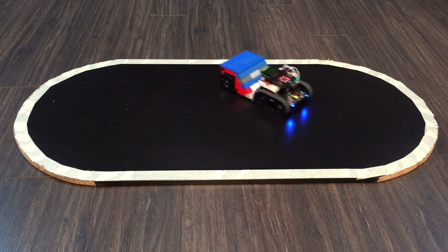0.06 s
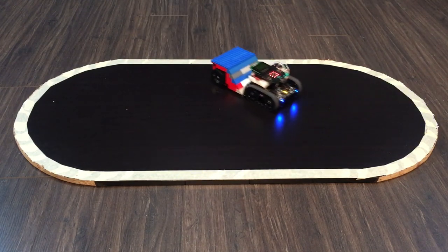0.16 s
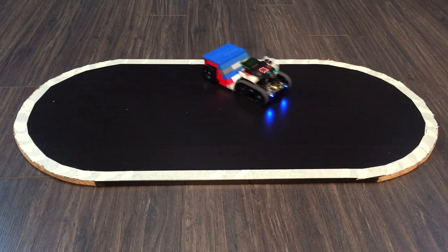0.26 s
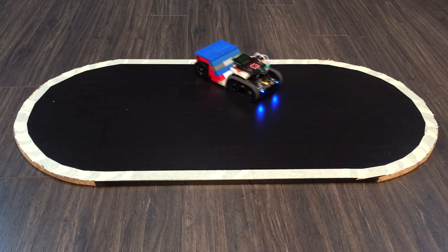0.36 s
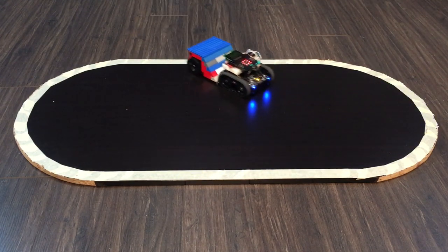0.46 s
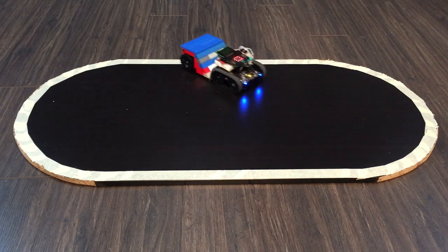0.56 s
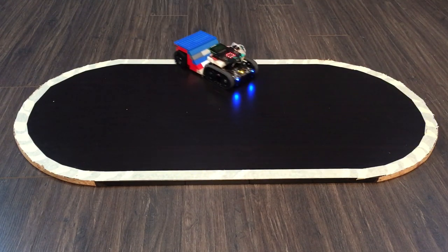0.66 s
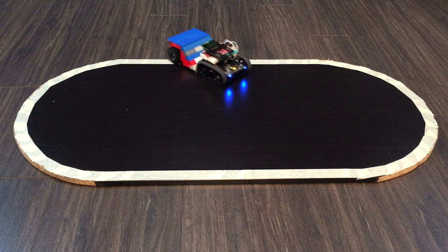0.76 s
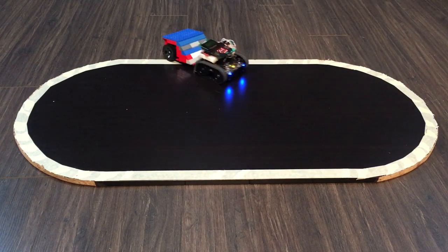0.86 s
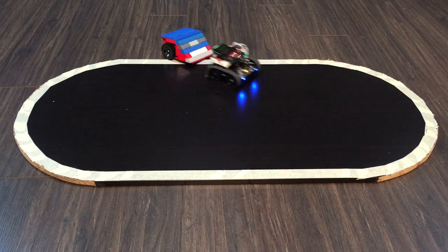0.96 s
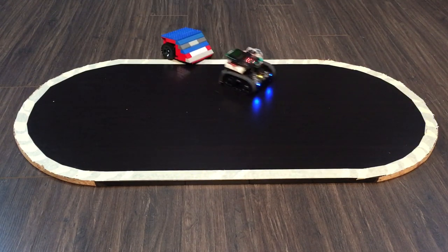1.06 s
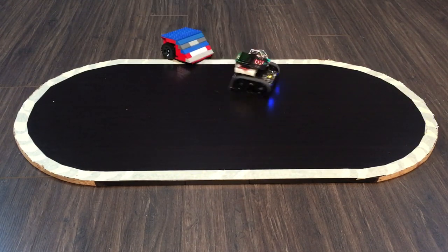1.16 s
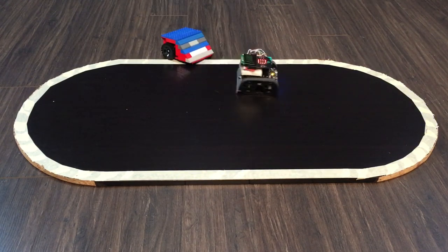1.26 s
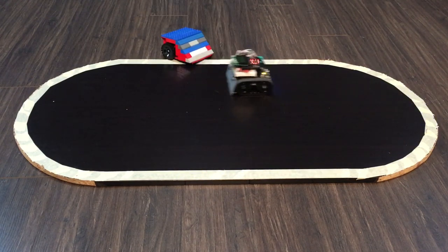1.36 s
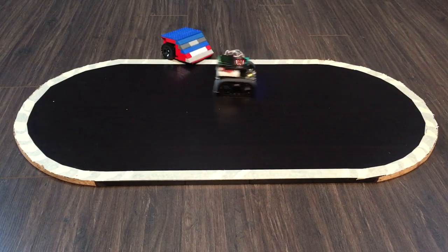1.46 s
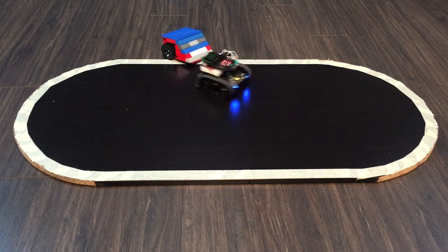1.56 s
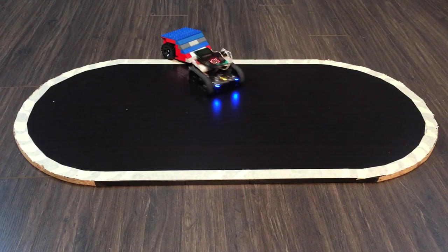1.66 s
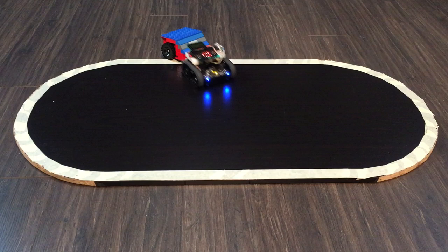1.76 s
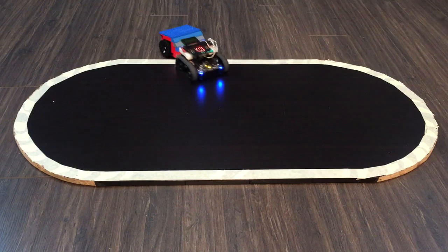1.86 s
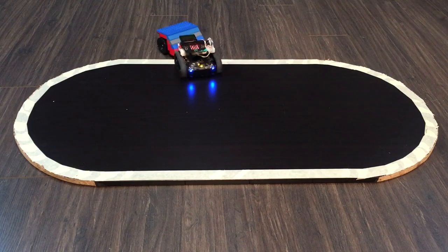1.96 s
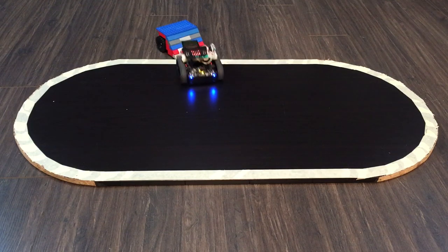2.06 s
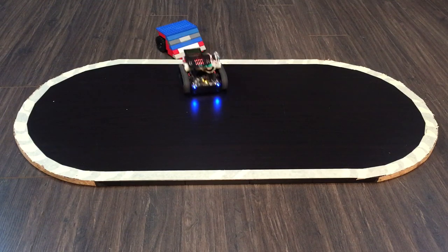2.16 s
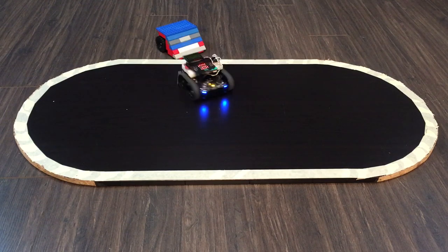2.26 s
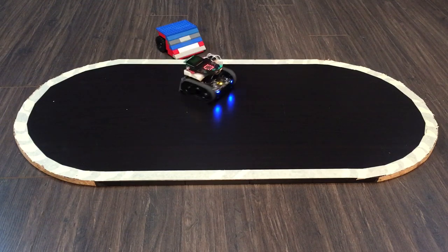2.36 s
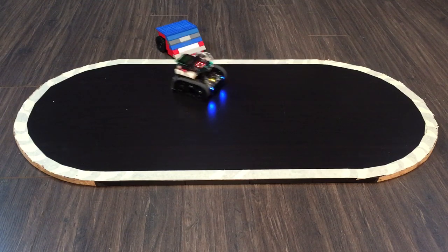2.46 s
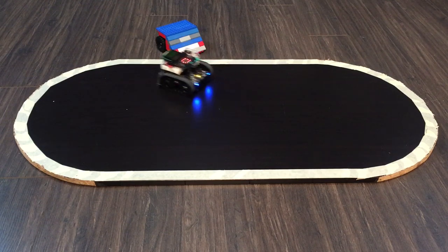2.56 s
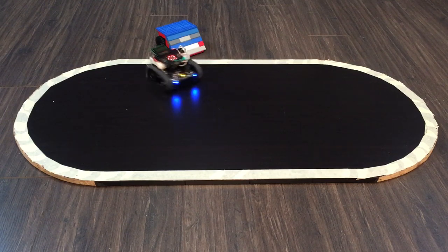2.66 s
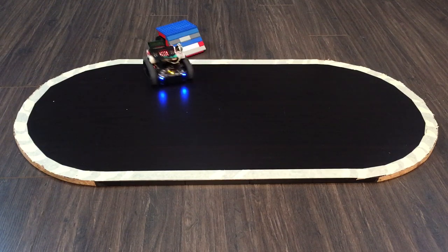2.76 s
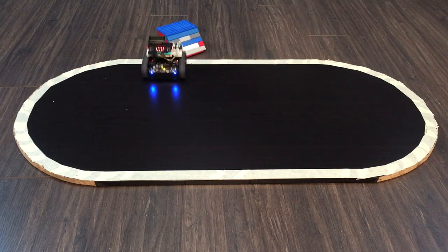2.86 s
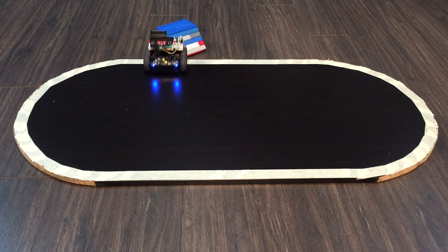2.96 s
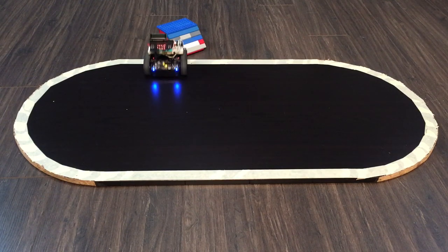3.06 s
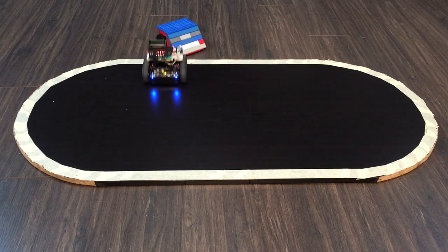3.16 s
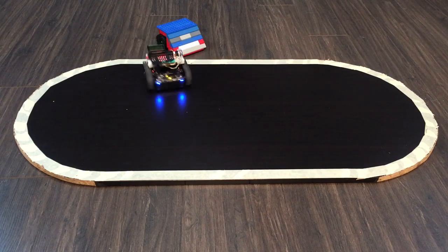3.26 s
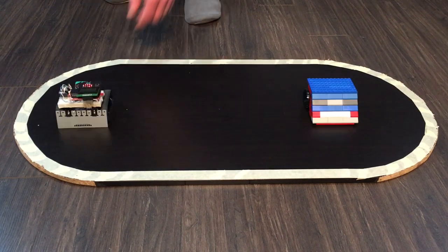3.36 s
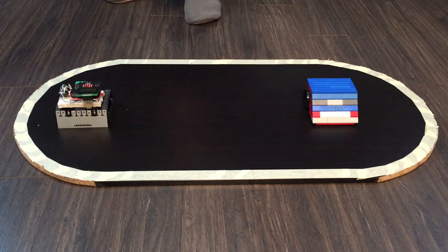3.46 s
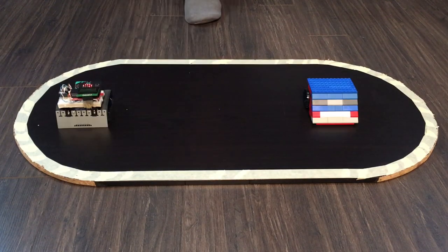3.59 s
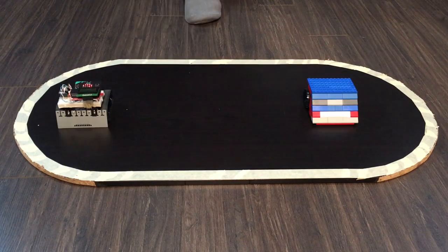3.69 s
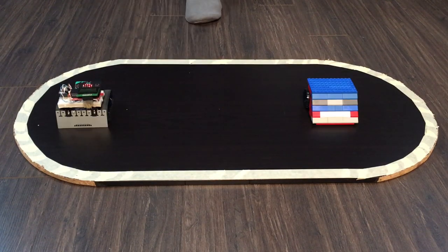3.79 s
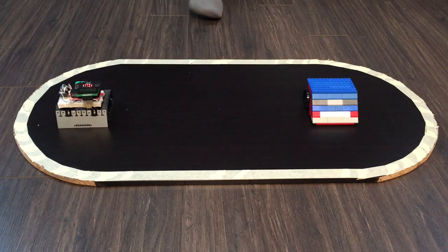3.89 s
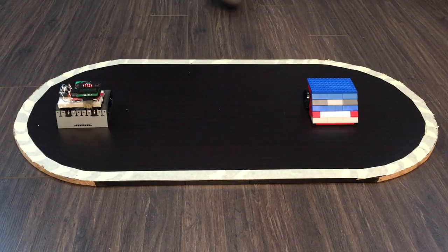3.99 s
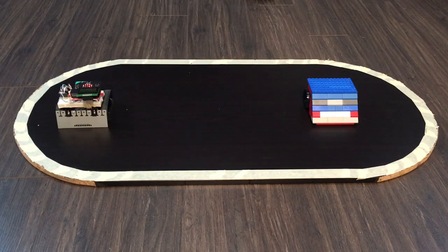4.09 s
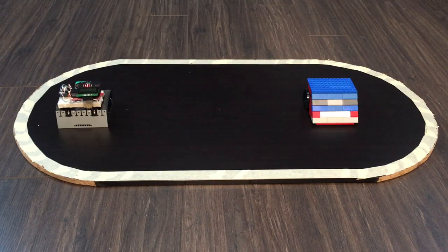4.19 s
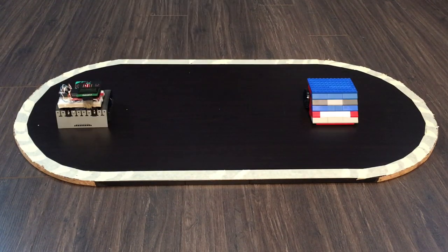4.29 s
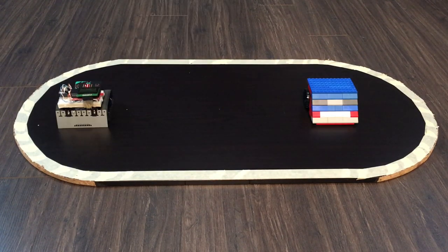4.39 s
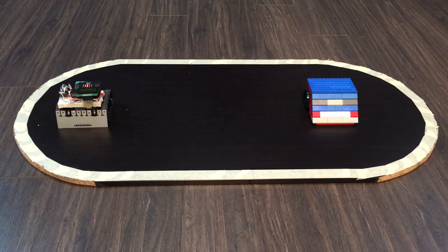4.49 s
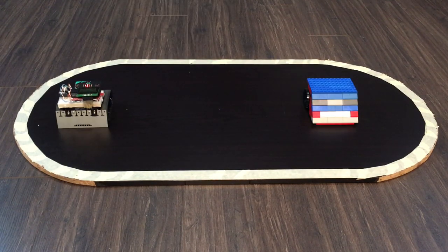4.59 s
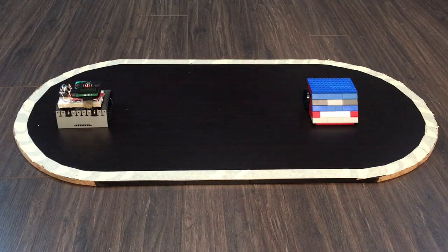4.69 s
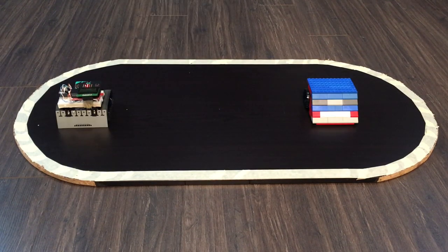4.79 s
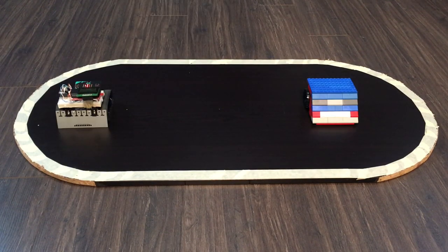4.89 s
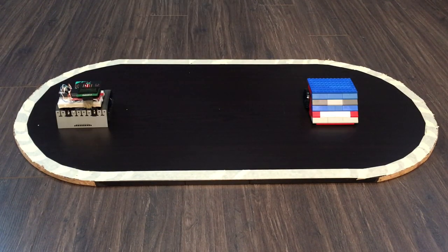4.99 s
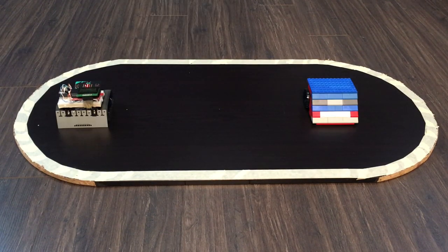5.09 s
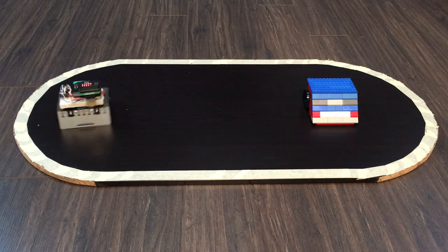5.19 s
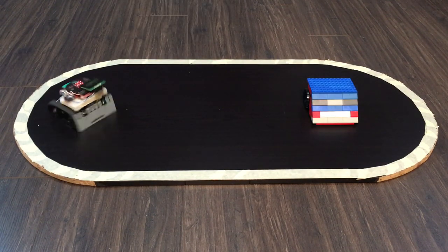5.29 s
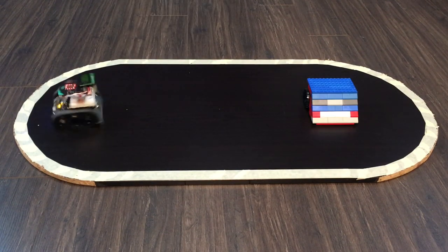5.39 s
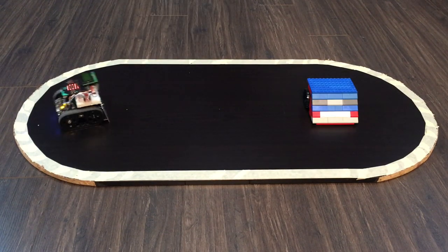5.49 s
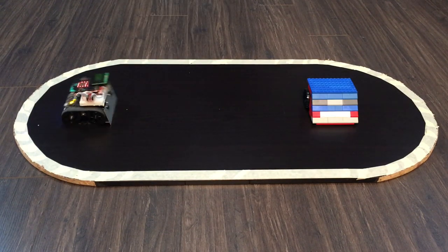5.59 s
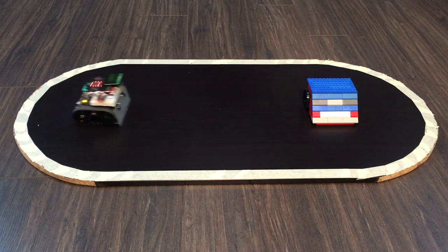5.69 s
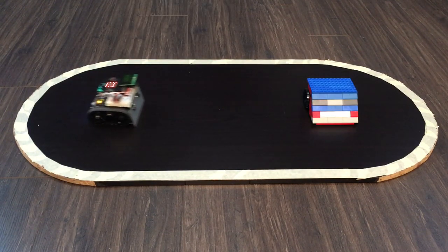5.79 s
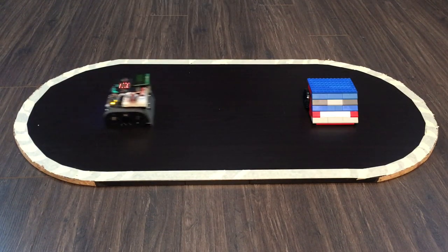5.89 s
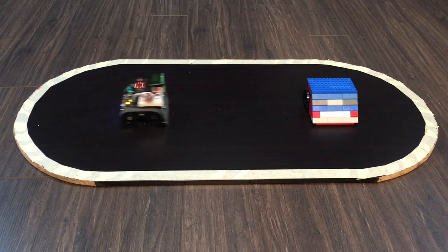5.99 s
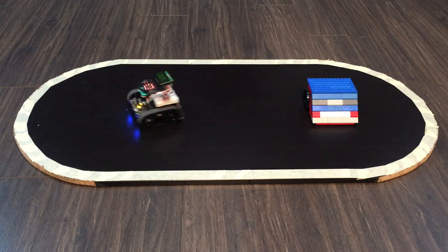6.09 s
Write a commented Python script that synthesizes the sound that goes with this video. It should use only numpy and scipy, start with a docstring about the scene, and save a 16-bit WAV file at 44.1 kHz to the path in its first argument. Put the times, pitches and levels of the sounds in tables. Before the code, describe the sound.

Small robot motors whine and rattle in surges, with hollow thumps and plastic clacks, then after a quiet pause a second robot whirs.

```python
"""Tracked robots on a wooden ring

Close to the microphone, in a live room with a mains hum, a small tracked robot shoves a plastic brick
car off a wooden ring and turns back. Its two geared motors whine and rattle; it thumps on the hollow
board and clacks against the car. After a quick fade come a faint scrape and soft steps moving away,
then a second robot starts up and pivots, its scoop clinking as it touches down."""
import sys
import numpy as np
from scipy import signal
from scipy.fft import rfft, irfft, next_fast_len
from scipy.io import wavfile

SR = 44100
rng = np.random.default_rng(int(sys.argv[2]) if len(sys.argv) > 2 else 0)


def unload_wav(signal):
    """Save mono or channel-first audio to the path in sys.argv[1] as 16-bit WAV at rate SR, clipped to [-1, 1]."""
    wavfile.write(
        sys.argv[1],
        SR,
        np.round(np.clip(np.atleast_2d(signal).T, -1, 1) * 32767).astype(np.int16),
    )


N = 270774
T = np.arange(N) / SR


def undb(db):
    """Decibels to gain."""
    return 10 ** (np.asarray(db) / 20)


def unit(x):
    """Scale to rms 1."""
    return x / np.sqrt(np.mean(x ** 2))


def peak(x, db):
    """Scale to a peak level."""
    return x * undb(db) / np.abs(x).max()


def noise(size=N):
    """White noise."""
    return rng.standard_normal(size)


def wander(rate_hz):
    """Smooth random drift of rms 1."""
    return unit(np.interp(T * rate_hz, np.arange(N), noise()))


def band(x, low_hz, high_hz, order=2):
    """Band-pass."""
    edges = [low_hz, min(high_hz, SR / 2 - 1)]
    return signal.sosfilt(signal.butter(order, edges, "band", fs=SR, output="sos"), x)


def colour(x, points):
    """Minimum-phase filter through (frequency_hz, gain_db) points."""
    hz, db = np.transpose(points)
    size = next_fast_len(len(x) + 4096)
    size += size % 2
    bins_hz = np.maximum(np.arange(size // 2 + 1) * SR / size, 1)
    gain = undb(np.interp(np.log(bins_hz), np.log(hz), db))
    cepstrum = irfft(np.log(gain))
    cepstrum[1:size // 2] *= 2
    cepstrum[size // 2 + 1:] = 0
    return irfft(rfft(x, size) * np.exp(rfft(cepstrum)))[:len(x)]


def add(out, start_s, x):
    """Mix a sound in at a time."""
    i = int(start_s * SR)
    out[i:i + len(x)] += x[:N - i]


def settle(times, targets, initial, rise_s=0.015, fall_s=0.015):
    """Close in on each new target, by default as fast as the load on the gears settles."""
    out = np.full(N, float(initial))
    for start_s, target in zip(times, targets):
        i = int(start_s * SR)
        lag_s = rise_s if target > out[i] else fall_s
        out[i:] = target + (out[i] - target) * np.exp(-T[:N - i] / lag_s)
    return out


# How well the gearbox radiates the mesh tone: pitch_hz, gain_db
GEARBOX_RESPONSE = [(1800, -23), (2300, 0), (2650, -2), (3100, -7.5), (3450, 0.5), (3850, 2.5), (4300, 3.5)]


def motor(times, commanded_hz, pick_up_hz=2246, strain_db_per_octave=-6):
    """A motor's mesh pitch and tone gain in dB; the tone thins while it strains or coasts."""
    hz = settle(times, commanded_hz, pick_up_hz, rise_s=0.052, fall_s=0.034)
    aim_hz = settle(times, commanded_hz, commanded_hz[0])
    radiated_db = np.interp(hz, *np.transpose(GEARBOX_RESPONSE))
    strain_db = strain_db_per_octave * np.abs(np.log2(hz / aim_hz))
    track_drag = 1 + 0.006 * wander(24)
    return hz * track_drag, radiated_db + strain_db


# Overtones of the meshing teeth: multiple, gain_db
MESH_OVERTONES = [(2, -14), (3, -9.5), (4, -8.5), (5, -7.5), (6, -8)]


def gear_whine(hz, whine_db, overtone_db, teeth=12, rough_db=3, top_hz=14200):
    """Teeth mesh at an unsteady rate, so higher overtones smear; the off-centre pinion adds sidebands."""
    unsteady_hz = hz * (1 + 0.0055 * wander(70) + 0.005 * wander(1200))
    mesh = 2 * np.pi * np.cumsum(unsteady_hz) / SR
    mesh += 0.22 * np.sin(mesh / teeth)
    backlash = 0.7 * wander(260)
    grip = undb(rough_db * wander(250) + 2.2 * wander(50))
    rasp = 0.45 * wander(900) * np.cos(mesh)
    out = undb(whine_db) * unit(grip * (np.sin(mesh + backlash) + rasp))
    for multiple, db in MESH_OVERTONES:
        radiated = 1 / (1 + (multiple * hz / top_hz) ** 24)
        tooth_load = undb(rough_db * wander(300) + 3.5 * wander(45))
        out += radiated * undb(overtone_db + db) * unit(tooth_load * np.sin(multiple * mesh))
    return out


def tooth_marks(hz, teeth=12, points=2048, orders=64, uneven_db=4.5):
    """Gear flaws come round with every shaft turn: an uneven comb that follows the speed."""
    one_turn = irfft(rfft(noise(points))[:orders] * undb(uneven_db * noise(orders)), points)
    turns = np.cumsum(hz * (1 + 0.005 * wander(70))) / SR / teeth
    return unit(np.interp(turns % 1, np.arange(points) / points, one_turn))


def gear_rattle(hz, other_hz, chassis, grain_db=2, chatter_db=1):
    """Loose teeth and brushes tick into the chassis, partly at random, partly in step with the shafts."""
    marks = sum(wander(14) * tooth_marks(mesh_hz) for mesh_hz in (hz, hz, other_hz, other_hz))
    ticks = noise() + 0.5 * band(marks, 4500, 20000, order=1)
    flicker = undb(grain_db * wander(2500) + chatter_db * wander(150))
    rattle = colour(ticks * flicker, chassis)
    return rattle / band(rattle, 8000, 15500).std()


# Gearbox and chassis colour, one list for each robot: frequency_hz, gain_db
CHASSIS_COLOURS = [
    [(180, -45.5), (300, -5), (469, -4), (643, -17), (1170, -21), (1400, -11), (1990, -8), (2590, -9),
     (3990, -6.5), (4870, -12), (6040, -8), (9290, -10.5), (10400, -4.5), (12300, -6.5), (15800, -9)],
    [(180, -44), (300, -12.5), (391, -4.5), (723, -27), (911, -14), (1130, -16.5), (1400, -9.5),
     (2160, -9.5), (2550, -7.5), (2820, -3), (4870, -6.5), (9290, -8), (10300, -2), (12100, -3.5),
     (15800, -6.5)],
]
# The drive cuts out briefly as a robot changes direction: centre_s, depth_db
DRIVE_PAUSES = [(.84, -1.5), (1.097, -13), (1.93, -10), (2.175, -12), (2.68, -5.5), (3.188, -9),
                (5.446, -4.5)]


def robot(commands, chassis_index, whine_db, rattle_db, pause_s=0.015):
    """Two motors and their gear trains in one chassis, following the drive commands."""
    times, lead_aim_hz, other_aim_hz, *levels = np.transpose(commands)
    lead_hz, lead_tone_db = motor(times, lead_aim_hz)
    other_hz, other_tone_db = motor(times, other_aim_hz)
    drive_db, lead_db, other_db, overtone_db = (settle(times, db, db[0]) for db in levels)
    drive_db += sum(db * np.exp(-0.5 * ((T - s) / pause_s) ** 2) for s, db in DRIVE_PAUSES)
    lead = gear_whine(lead_hz, drive_db + lead_db + whine_db + lead_tone_db, drive_db + overtone_db)
    other = gear_whine(other_hz, drive_db + other_db + other_tone_db, drive_db + other_db - 0.5)
    rattle = gear_rattle(lead_hz, other_hz, CHASSIS_COLOURS[chassis_index])
    return lead + other + undb(drive_db + rattle_db) * rattle


# The first robot's drive commands; the last three columns are offsets from drive_db:
# start_s, lead_pitch_hz, other_pitch_hz, drive_db, lead_db, other_db, lead_overtone_db
SHOVE_COMMANDS = [(0, 2415, 2136, -47.5, -6, -15, 1.5), (.312, 2139, 2102, -49, -3.5, -3.5, 0),
                  (.879, 3810, 3700, -45, -6.5, -17, -13), (1.076, 2566, 2116, -49, -3.5, -7.5, -5),
                  (1.284, 3116, 3053, -45.5, -10, -8, 2), (1.396, 4202, 4136, -45, -6, -8.5, 5),
                  (1.545, 3060, 3893, -46.5, -1, -21, 6), (1.723, 3635, 3789, -44, -4, -19.5, 3.5),
                  (1.88, 2330, 3030, -45, -10, -18, -4), (1.98, 3960, 3800, -45.5, -5.5, -15, -6),
                  (2.15, 2440, 2043, -49.5, -2.5, -14, -5), (2.37, 2953, 2750, -45.5, -15, -4, 4),
                  (2.451, 3766, 3550, -43.5, -6.5, -9.5, -4), (2.556, 4235, 4130, -44, -6, -14.5, -4),
                  (2.648, 3045, 4117, -46.5, 1.5, -22, 6), (2.915, 3585, 3380, -46.5, -15, -6, -17.5),
                  (3.175, 2544, 3900, -49, -6, -12, -7)]


def shoving_robot():
    """Close by on the ring, the first robot's motors surge and slow as it shoves and turns."""
    return robot(SHOVE_COMMANDS, chassis_index=0, whine_db=0.5, rattle_db=-2)


# The board under the car's wheels: frequency_hz, gain_db
WHEEL_RUMBLE = [(53, -30), (90, -41), (130, -8.5), (178, -24.5), (220, -1.5), (254, -5), (329, 1.5),
                (370, -2), (470, -5.5), (599, -15.5), (658, -16), (740, -21.5), (1100, -25.5), (1500, -25),
                (1950, -44), (3300, -120)]


def rolling_car(edge_s=0.747, release_s=0.1, fade_db_per_s=-7):
    """Hard wheels drum the board, ever more lightly, until the car leaves its edge."""
    on_board = np.clip((edge_s - T) / release_s, 0, 1)
    rumble = unit(colour(noise() * undb(0.66 * wander(91)), WHEEL_RUMBLE))
    return on_board * undb(-45 + fade_db_per_s * T) * rumble


# Air in the room: frequency_hz, gain_db
ROOM_AIR = [(15, -59.5), (25, -45.5), (49, -16.5), (86, -18.5), (102, -19), (123, -15.5), (152, -15),
            (189, -19), (333, -13.5), (392, -20), (691, -21), (834, -24.5), (981, -21.5), (1430, -30.5),
            (15800, -49)]
# An appliance in the room: pitch_hz, level_db
MAINS_HUM = [(60, -75.5), (120, -63.5), (197, -75.5), (423, -75)]


def room_tone():
    """Steady air and an appliance's mains hum around the microphone."""
    air = colour(noise(), ROOM_AIR)
    out = undb(-64) * air / band(air, 210, 15800).std()
    for hz, db in MAINS_HUM:
        level = undb(db + 0.87 * wander(5.6))
        out += level * unit(np.sin(2 * np.pi * hz * T + 0.25 * wander(2.8)))
    return out


# Modes of the hollow board: pitch_hz, gain_db, t60_s
BOARD_MODES = [(131.5, -6.5, 0.18), (160.7, -7, 0.15), (233.4, -9.5, 0.25), (309, -10, 0.096),
               (359.8, 4.5, 0.082), (416, 0.5, 0.065), (502.5, -3, 0.096), (553, -2, 0.089),
               (599, -4.5, 0.07), (660, -5, 0.061), (704.5, -8, 0.1), (768, -14.5, 0.12), (933, -18, 0.062),
               (1240, -12, 0.061)]
# Blows on the board: start_s, level_db, clatter_offset_db, centre_hz
BOARD_THUMPS = [(.318, -28, -14, 310), (0.577, -27, -12, 287), (.612, -30.5, -22, 280),
                (.857, -18.5, -11, 351), (0.904, -29.5, -4.5, 413), (.926, -24.5, -8, 363),
                (1.796, -18, -8, 363), (1.84, -22.5, -17, 400), (1.953, -18.5, -16, 509),
                (1.974, -25.5, -13, 470), (2.005, -22.5, -10, 424), (2.0225, -13, -8, 490),
                (2.052, -22, -6.5, 482.6), (2.945, -29.5, 1, 421.6), (2.975, -22.5, -7, 450),
                (2.992, -25.5, -12, 436.5), (3.067, -28.5, 1.5, 210)]


def board_thumps(attack_s=0.00093, thud_s=0.0097, clatter_s=0.0068, spread_octaves=1.01):
    """Each drop rings the board's modes, the low ones when it is soft, and shakes loose plastic parts."""
    out, t = np.zeros(N), T[:SR // 2]
    for start_s, db, clatter_db, centre_hz in BOARD_THUMPS:
        ring = np.zeros(len(t))
        for hz, mode_db, t60 in BOARD_MODES:
            scatter_db, detune, phase = noise(3)
            reach = np.exp(-0.5 * (np.log2(hz / centre_hz) / spread_octaves) ** 2)
            # one blow starts all the modes nearly in step
            swing = np.sin(2 * np.pi * hz * (1 + 0.005 * detune) * t + 0.5 * phase)
            ring += reach * undb(mode_db + scatter_db - 60 * t / t60) * swing
        ring *= 1 - np.exp(-t / attack_s)
        thud = band(noise(len(t)) * np.exp(-t / thud_s), centre_hz * 0.74, centre_hz * 1.36)
        clatter = band(noise(len(t)) * np.exp(-t / clatter_s), 990, 2140, order=1)
        add(out, start_s, peak(ring, db - 2) + peak(thud, db - 5) + peak(clatter, db + clatter_db))
    return band(out, 93, 16040)


# Colour of struck plastic: frequency_hz, gain_db
PLASTIC_COLOUR = [(400, -14), (800, -14), (1350, -4), (2100, 2), (2900, -6), (4000, -3.5), (5500, -11),
                  (8000, -10.5), (14000, -12.5), (16000, -14)]
# The robot knocks against the car: start_s, level_db, low_hz, high_hz
PLASTIC_CONTACTS = [(1.793, -9.5, 2380, 12000), (1.7950, -15.5, 700, 6020), (3.0504, -18.5, 600, 9000),
                    (3.0652, -9.5, 400, 9520), (3.0715, -21, 400, 3500), (3.077, -20.5, 405, 3000)]


def plastic_clacks(decay_s=0.0013):
    """Plastic on plastic: a crack of a millisecond or two, duller when the contact is softer."""
    out, t = np.zeros(N), T[:SR // 20]
    for start_s, db, low_hz, high_hz in PLASTIC_CONTACTS:
        crack = colour(noise(len(t)) * np.exp(-t / decay_s), PLASTIC_COLOUR)
        add(out, start_s, peak(band(crack, low_hz, high_hz, order=1), db))
    return out


# Resonances of the scrape: pitch_hz, half_width_hz, gain_db
SCRAPE_RESONANCES = [(955, 33, 1.5), (2210, 65, -3), (2560, 56, -7), (9000, 190, -18), (9780, 39, -18)]


def scrape():
    """A brief faint rub that rings in a few narrow resonances."""
    ring = sum(undb(db) * band(noise(), hz - half_hz, hz + half_hz, order=1)
               for hz, half_hz, db in SCRAPE_RESONANCES)
    return unit(ring) * undb(-63.5) * np.interp(T, [3.33, 3.37, 3.43, 3.47], [0, 1, 1, 0])


# Colour of rubbing cloth: frequency_hz, gain_db
CLOTH_COLOUR = [(290, -36), (500, -4.5), (1370, -7), (1960, -4.5), (2760, -11), (3720, -8), (4800, -13.5),
                (6960, -13.5), (15000, -16)]
# Steps and trouser swishes, moving away from the microphone: peak_s, level_db, rise_s, fall_s
STEP_SWELLS = [(3.49, -63.5, 0.011, 0.023), (3.552, -55, 0.027, 0.026), (3.57, -51.5, .001, .004),
               (3.62, -65.5, 0.017, 0.14), (3.761, -53, 0.0017, 0.011), (3.78, -60.5, .01, 0.03),
               (3.93, -60.5, 0.0097, 0.038), (4.329, -58, 0.016, 0.055), (4.56, -64.5, 0.041, 0.03),
               (4.66, -58.5, 0.015, .03), (4.82, -67.5, .06, .05)]


def soft_steps():
    """Socks and cloth brush past in soft swells."""
    swell = sum(undb(db) * np.exp(-np.maximum((peak_s - T) / rise_s, (T - peak_s) / fall_s))
                for peak_s, db, rise_s, fall_s in STEP_SWELLS)
    return swell * unit(colour(noise() * undb(2.6 * wander(900)), CLOTH_COLOUR))


# The second robot's drive commands:
# start_s, lead_pitch_hz, other_pitch_hz, drive_db, lead_db, other_db, lead_overtone_db
PIVOT_COMMANDS = [(5.16, 3980, 3890, -47, -7, -12, -9), (5.21, 3987, 3897, -46, 7.5, -1.5, -1),
                  (5.3, 3964, 3930, -44.5, 2.5, -5, -0.5), (5.43, 1872, 1790, -51, -20, -18, -3),
                  (5.485, 3145, 3070, -50, -3, -12, 8), (5.615, 2398, 2327, -49, -11, -15, 0),
                  (5.685, 2722, 2630, -48.5, -2.5, -12.5, -3), (5.799, 2654, 3280, -48.5, -7, -8, -23),
                  (5.984, 3270, 2256, -49, 7, -26, 6.5), (6.097, 2350, 2342, -47.5, -15, -18, -5)]


def pivoting_robot():
    """The second robot's motors start up close by and keep changing speed as it pivots."""
    switch_on = np.interp(T, [5.158, 5.2], [0, 1])
    return switch_on * robot(PIVOT_COMMANDS, chassis_index=1, whine_db=-2.5, rattle_db=-0.7)


# Modes of the second robot's frame and scoop: pitch_hz, gain_db, t60_s
SCOOP_MODES = [(424, -14.5, 0.14), (1006, -15, .15), (1423, -1.5, 0.11), (1760, -9, .12),
               (2060, -10, 0.069), (2634, 2.5, 0.031)]
# The scoop touches down: start_s, level_db
SCOOP_TOUCHES = [(5.854, -35.5), (5.868, -42), (5.905, -41)]


def scoop(motors, shaken_db=-17, tick_s=0.025):
    """The scoop rings along with the motors and clinks when it touches down."""
    clinks, t = np.zeros(N), T[:SR // 2]
    ring = sum(undb(db - 60 * t / t60) * np.sin(2 * np.pi * hz * t) for hz, db, t60 in SCOOP_MODES)
    for start_s, db in SCOOP_TOUCHES:
        tick = band(noise(len(t)) * np.exp(-t / tick_s), 200, 3800)
        add(clinks, start_s, peak(ring, db + 0.5) + peak(tick, db - 3))
    shaken = unit(signal.fftconvolve(motors, ring)[:N])
    return clinks + undb(shaken_db) * motors.std() * shaken


# Decay of the live room: frequency_hz, t60_s
ROOM_DECAY = [(100, 0.54), (400, 0.38), (1200, 0.61), (2500, 0.52), (4000, 0.42), (8000, 0.35),
              (15000, 0.25)]


def room(x, wet_db, gap_s=0.0036):
    """Direct sound reaches the microphone, then a tail from the walls that dies sooner in the treble."""
    tail, t = np.zeros(SR), T[:SR]
    hz, t60 = np.transpose(ROOM_DECAY)
    edges = np.geomspace(60, 18000, 19)
    for low_hz, high_hz in zip(edges, edges[1:]):
        band_t60 = np.interp(np.log(low_hz * high_hz) / 2, np.log(hz), t60)
        tail += band(noise(SR), low_hz, high_hz, order=3) * undb(-60 * t / band_t60)
    tail *= t > gap_s
    return x + undb(wet_db) * signal.fftconvolve(x, tail / np.linalg.norm(tail))[:N]


def scene(change_s=3.329, fade_out_s=0.04, fade_in_s=0.019):
    """Two bouts at one microphone: the first fades quickly; the quiet room and second robot follow."""
    first = room(shoving_robot(), wet_db=-5.5)
    first += room(rolling_car() + board_thumps(), wet_db=-2)
    first += room(plastic_clacks(), wet_db=-4)
    second = room(scrape() + soft_steps(), wet_db=-7.5)
    motors = pivoting_robot()
    second += room(motors + scoop(motors), wet_db=-8.5)
    bouts = np.where(T < change_s, first, second)
    fade = np.clip(np.maximum((change_s - T) / fade_out_s, (T - change_s) / fade_in_s), 0.04, 1)
    return (fade * (bouts + room_tone()))[None]


def record(dry, notch_hz=10350, half_width_hz=300, notch_depth=0.54, top_hz=15750):
    """The microphone port dips a narrow treble band, and the recorder cuts the top."""
    heard = dry - notch_depth * band(dry, notch_hz - half_width_hz, notch_hz + half_width_hz, order=1)
    return signal.sosfilt(signal.ellip(10, 0.2, 70, top_hz, fs=SR, output="sos"), heard)


dry = scene()
out = record(dry)
unload_wav(out)
```